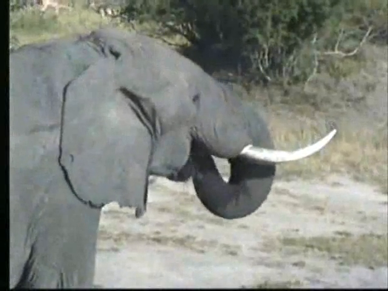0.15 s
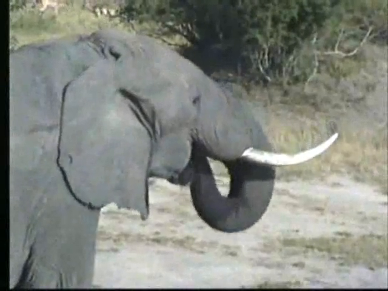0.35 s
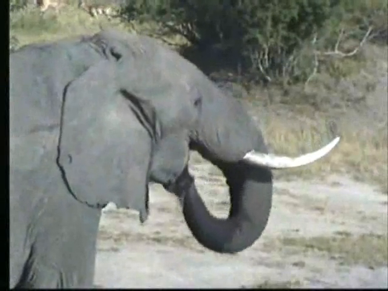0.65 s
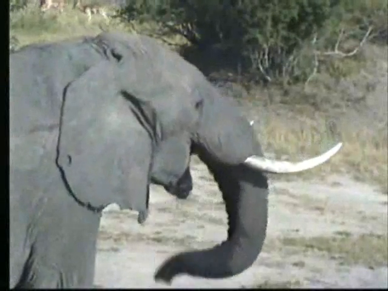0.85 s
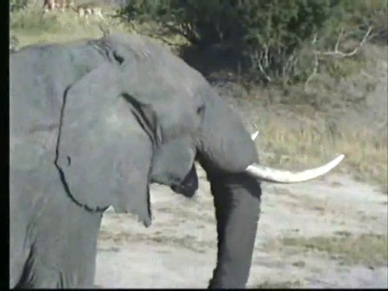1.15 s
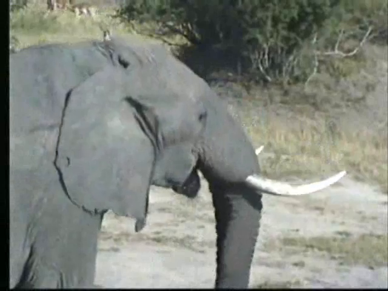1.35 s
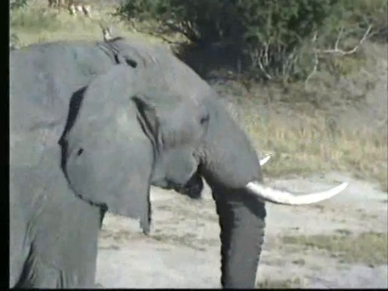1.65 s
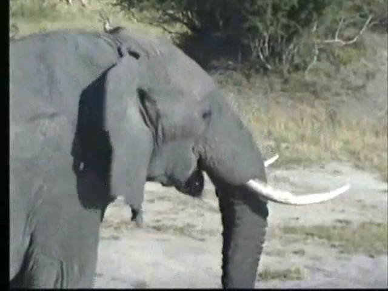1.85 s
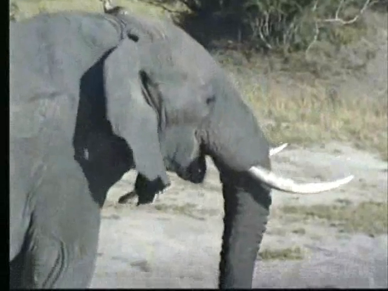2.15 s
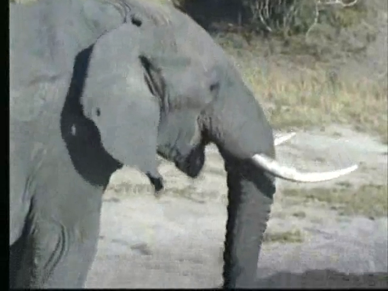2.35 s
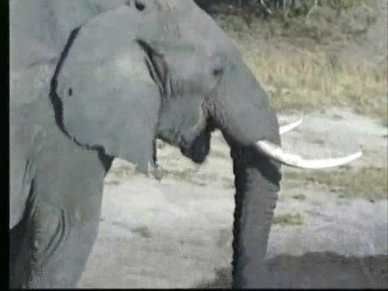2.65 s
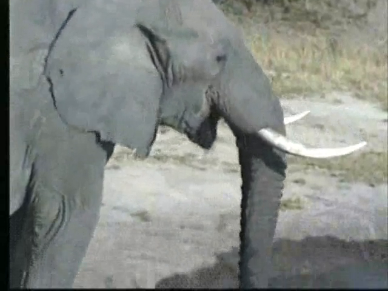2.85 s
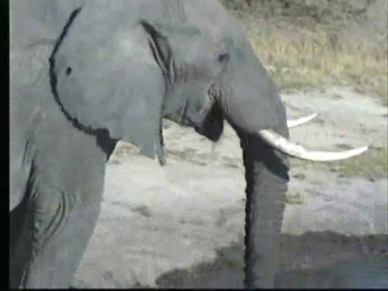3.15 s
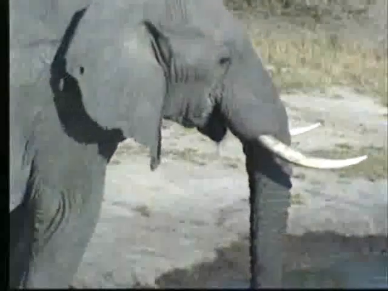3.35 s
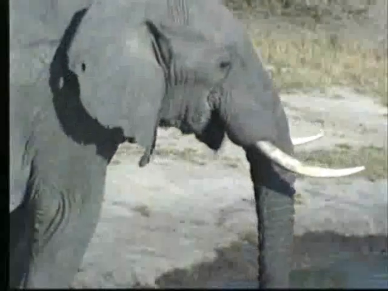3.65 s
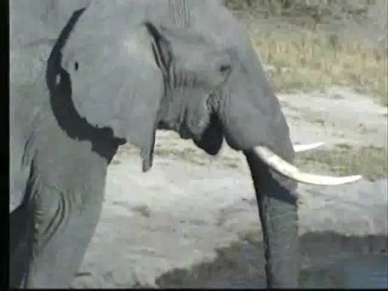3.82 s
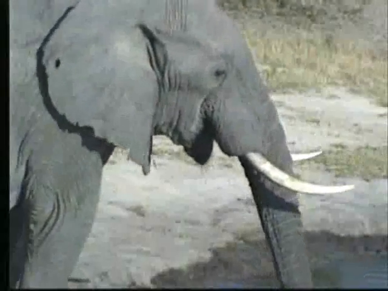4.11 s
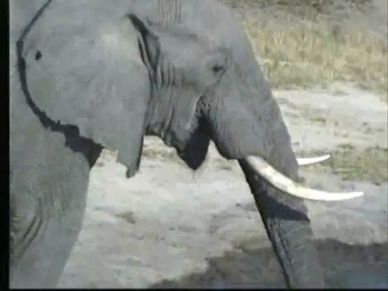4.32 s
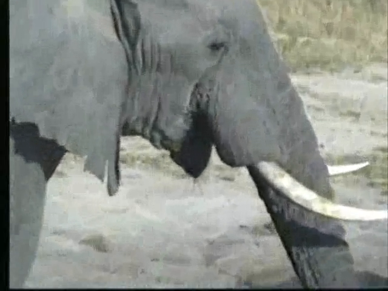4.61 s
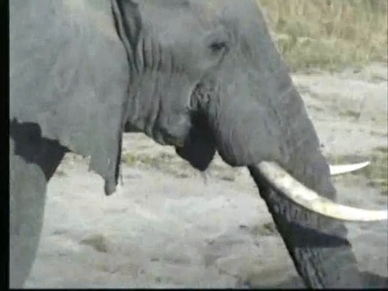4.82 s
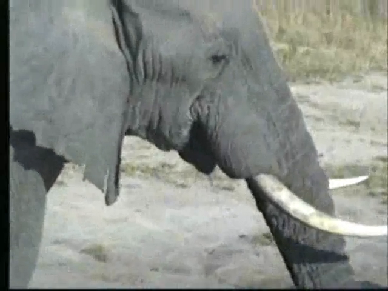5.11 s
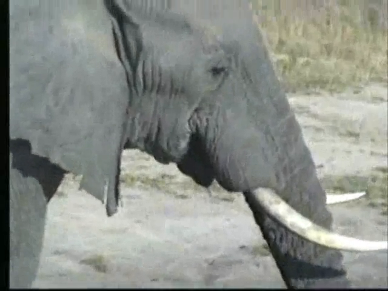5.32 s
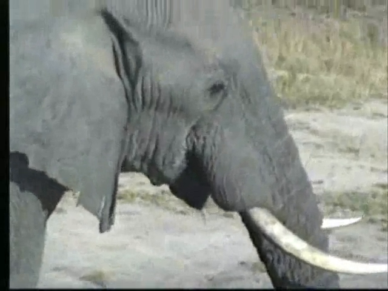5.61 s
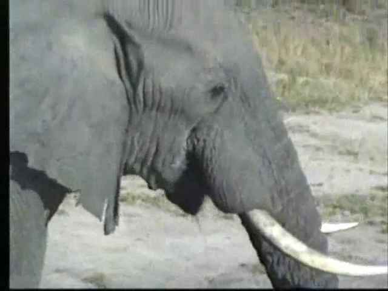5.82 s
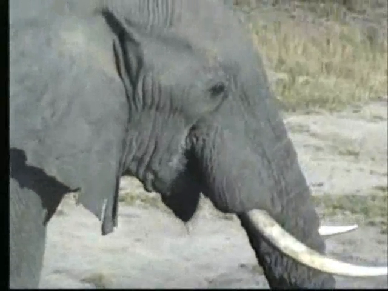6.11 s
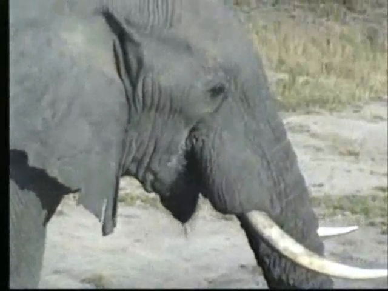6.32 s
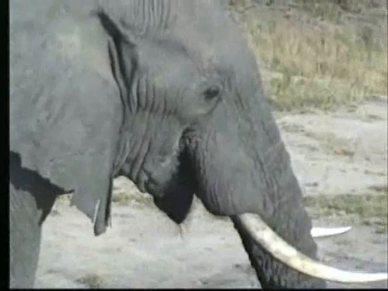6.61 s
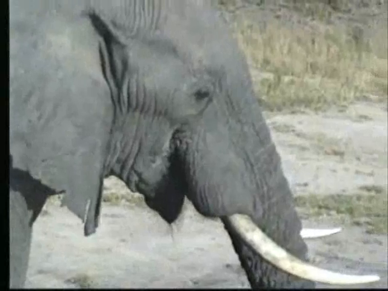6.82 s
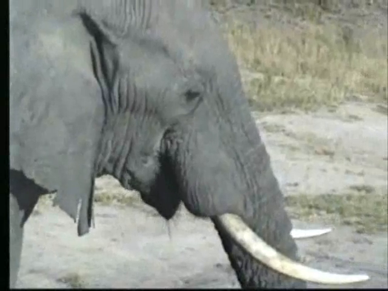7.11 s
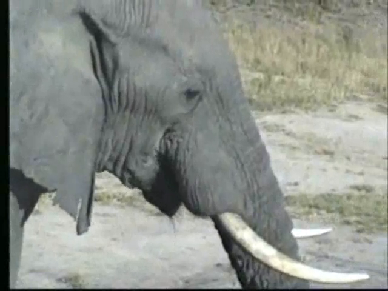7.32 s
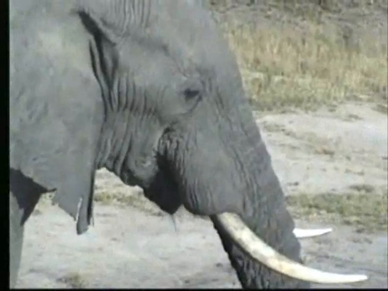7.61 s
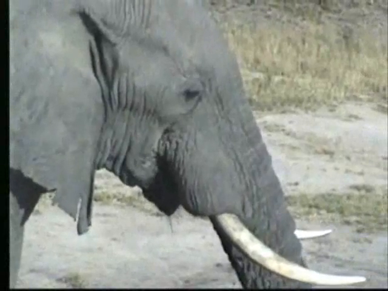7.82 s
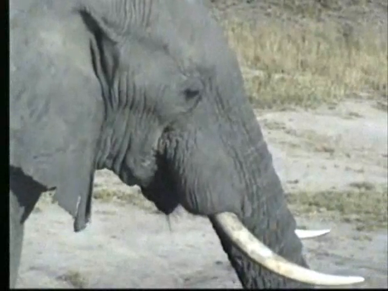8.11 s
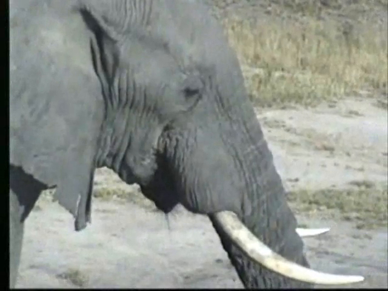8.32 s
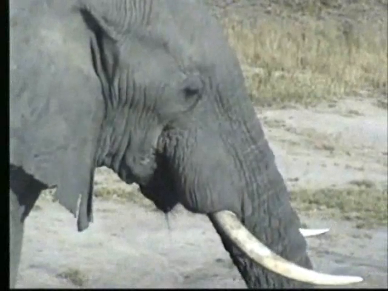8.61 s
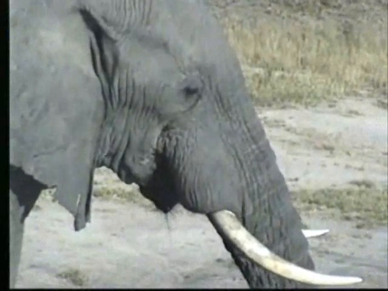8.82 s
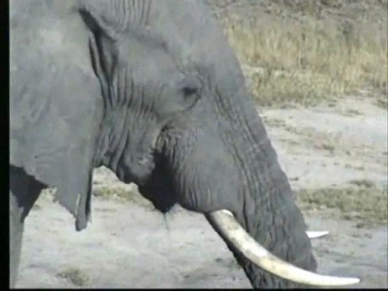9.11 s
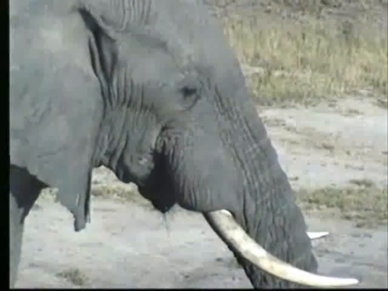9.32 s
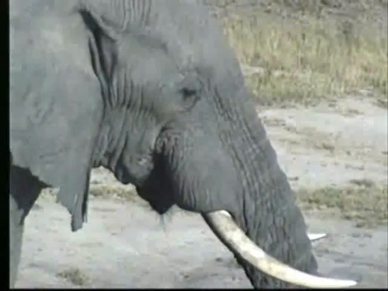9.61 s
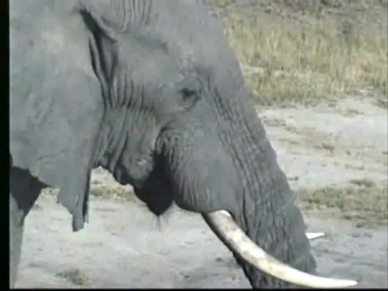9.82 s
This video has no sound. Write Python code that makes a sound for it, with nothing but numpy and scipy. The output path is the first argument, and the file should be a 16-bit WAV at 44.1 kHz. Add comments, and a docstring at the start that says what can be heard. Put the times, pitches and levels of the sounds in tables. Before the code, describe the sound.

Outdoors at a waterhole, an elephant empties its trunk into its mouth. Water splatters down in uneven bursts, with one heavy gush, then thins to isolated drips and a tinkling dribble. Later the trunk tip sloshes in the pool with hollow gurgles before quieting to small blips. A close, narrow-band camera microphone adds steady hiss and faint hum.

```python
"""Splashes, churning water and thin singing streams, over hiss and mains hum: an elephant drinks at a waterhole.
It empties its trunk into its mouth and spills a gush that patters as drops and thins to single drips and a dribble.
Then the lowered trunk tip sloshes and gurgles in the pool to refill.
Drops and air pockets ring as damped bubbles, foam is coloured noise and streams are narrow bands of noise.
One narrow-band camera microphone hears it all, with a very close reflection and a short scatter from the banks."""
import sys
import numpy as np
from scipy import signal
from scipy.fft import rfft, irfft, next_fast_len
from scipy.io import wavfile
from scipy.ndimage import uniform_filter1d, map_coordinates

SR = 44100
rng = np.random.default_rng(int(sys.argv[2]) if len(sys.argv) > 2 else 0)


def waveform_to_disk(signal):
    """Save audio, clipped to [-1, 1], as 16-bit WAV at the path in sys.argv[1]."""
    frames = np.transpose(np.atleast_2d(signal))
    scaled = np.clip(frames, -1, 1) * 32767
    samples = np.round(scaled).astype(np.int16)
    wavfile.write(sys.argv[1], SR, samples)


N = 438780
TIME = np.arange(N) / SR  # s

# All event levels are relative, ahead of the trim of their layer; colours give relative density.
# Hiss of the camera: [f/Hz, level/dB per Hz]
HISS_COLOUR = [(25, -12.5), (70, -11.5), (130, -12), (220, -5), (330, -4.5), (600, 0.84), (1800, 1),
               (4500, 2.5), (6600, 1.4), (7100, -5.5)]
# Mains hum of the camera: [f/Hz, rms level/dB]
HUM = [(100, -68), (150, -51), (250, -49), (350, -56)]
# Loads of water falling into the pool: [start t/s, rise t/s, hold t/s, spray level/dB,
# coarse drops level/dB above the spray]
SPILLS = [(0.0, 0.002, 0.034, -28, -0.5), (0.125, 0.032, 0.058, -27.5, 0), (0.485, .13, 0.021, -21.5, -7.5),
          (0.706, .006, 0.022, -21, -5), (0.76, 0.034, 0.12, -18.5, -5.5), (0.943, 0.011, 0.062, -22, -5),
          (1.095, .015, 0.06, -19.5, -22), (1.203, 0.024, 0.042, -21.5, -2.5),
          (1.284, 0.013, 0.087, -22, -15.5), (1.45, 0.011, .03, -24, -1.5), (1.48, 0.04, 0.05, -11, -8.5),
          (1.543, 0.037, 0.031, -12, -3.5), (1.69, 0.024, 0.11, -21.5, 0.5),
          (1.806, 0.046, 0.12, -25.5, 2.5), (1.994, 0.018, 0.32, -22.5, -12), (2.28, 0.011, 0.14, -24, -2),
          (2.566, 0.035, 0.084, -24.5, -5.5), (5.883, 0.039, 0.071, -20.5, -6),
          (6.06, 0.038, 0.059, -21.5, -3), (7.4, 0.033, 0.048, -31.5, -8), (8.612, 0.017, 0.24, -31, 0.5),
          (9.153, 0.047, .02, -28.5, 1), (9.554, 0.032, 0.044, -35.5, 2), (9.727, 0.032, .02, -39, 6)]
# Slapping sheets of water: [f/Hz, level/dB per Hz]
SLAP_COLOUR = [(900, -30), (1250, -6), (1500, 3.5), (1800, 4), (2050, -13.5), (2500, -20)]
# Coarse drops: [f/Hz, level/dB per Hz]
DROP_COLOUR = [(1500, -38), (2100, -5), (2600, -1), (3000, -3.5), (3400, -0.5), (3900, -9.5), (5000, -31)]
# Fine falling spray: [f/Hz, level/dB per Hz]
SPRAY_COLOUR = [(2400, -26), (3500, -5.5), (3850, 1.5), (4450, 2.5), (5250, 1), (5800, 0.5), (6400, 0),
                (7000, -4), (7600, -32)]
# Spray thrown up by the churning: [f/Hz, level/dB per Hz]
CHURN_SPRAY_COLOUR = [(2400, -23.5), (3500, -8), (4000, -1.5), (4500, 4.5), (5400, -0.5), (6600, -2.5),
                      (7400, -22.5)]
# Shoves that churn the pool: [start t/s, rise t/s, hold t/s, level/dB, air pocket f/Hz,
# splash level/dB above the churning]
SLOSHES = [(0.0, 0.0043, 0.15, -27, 743, -4.5), (0.275, 0.028, 0.21, -33, 453, -33),
           (0.552, 0.041, 0.11, -30, 530, 3), (0.743, 0.029, 0.11, -29, 580, -24),
           (1.106, 0.0098, 0.13, -33.5, 502, 7.5), (1.555, 0.065, 0.11, -19.5, 834, 2),
           (1.755, .02, 0.16, -30, 852, -5), (2.03, 0.017, 0.043, -32, 710, 7.5),
           (5.987, 0.018, 0.16, -17, 645, -3.5), (6.165, 0.02, 0.037, -15, 726, -3),
           (6.271, 0.033, 0.063, -16.5, 627, -5.5), (6.415, 0.055, 0.025, -19.5, 560, 3),
           (6.527, 0.055, 0.04, -15, 617, -4), (6.645, 0.0068, 0.048, -23.5, 563, -5),
           (6.741, 0.13, 0.055, -22, 524, -12.5), (6.949, 0.039, 0.072, -25, 732, -6),
           (7.07, 0.03, 0.16, -31.5, 620, -4.5), (7.232, 0.003, 0.01, -30, 633, 5.5),
           (7.428, 0.017, 0.043, -32, 578, -17), (7.549, 0.017, .06, -35, 474, -18),
           (8.535, .03, 0.058, -29, 633, -23), (8.662, 0.012, 0.1, -27, 741, -9.5),
           (9.215, 0.045, 0.025, -22.5, 680, -7), (9.291, 0.0097, 0.012, -20, 648, -0.5),
           (9.785, 0.016, 0.02, -29.5, 836, -0.5)]
# Churned air pockets: [f/Hz, level/dB per Hz]
SLOSH_COLOUR = [(50, -29), (130, -16), (250, 2), (350, -7.5), (450, -2), (600, 2), (780, -2.5), (1080, 2.5),
                (1300, -4), (2000, -13)]
# Narrow streams that sing at a gliding pitch: [start t/s, length t/s, level/dB, first f/Hz,
# f/Hz at the turn, last f/Hz, turn as a share of the length]
STREAMS = [(0.0, 0.34, -33, 620, 623, 580, 0.61), (0.0, 0.12, -29, 784, 884, 997, 0.45),
           (0.282, 0.15, -31, 390, 305.5, 340, 0.35), (1.855, 0.14, -26, 4600, 3890, 3940, 0.42),
           (1.905, 0.077, -23, 3250, 2800, 3030, 0.54), (2.07, 0.11, -33, 4300, 4550, 5600, 0.63),
           (2.366, 0.065, -24, 2950, 2650, 2990, 0.41), (2.467, 0.098, -27.5, 3150, 3450, 4060, 0.45),
           (2.508, 0.056, -33.5, 1800, 2000, 2180, 0.44), (4.097, 0.17, -37.5, 2100, 2165, 2200, 0.47),
           (5.025, 0.079, -34.5, 2200, 2245, 2270, .5), (5.529, 0.11, -39, 2600, 2750, 3040, 0.45),
           (6.255, 0.054, -26, 4400, 4000, 4250, 0.59), (8.062, 0.093, -39, 1924, 1605, 1390, 0.47),
           (9.795, 0.079, -30, 5500, 5330, 5070, 0.43)]
# Single drops that hit the pool: [t/s, level/dB, bubble f/Hz at first, break-up decay t/s]
DRIPS = [(0.42, -11.5, 6100, 0.0035), (0.491, -8.5, 5060, .003), (0.506, -7.5, 5400, 0.0026),
         (0.5198, -5, 4920, 0.0022), (0.542, -3.5, 5220, 0.0024), (0.555, -8, 5640, 0.0022),
         (0.554, -17, 2830, .003), (0.593, -9, 6600, 0.002), (0.608, -7.5, 5370, .002),
         (0.638, -11.5, 6300, 0.0034), (0.7045, -8.5, 3800, 0.0027), (0.7107, -10.5, 2930, .006),
         (0.777, -9, 2620, 0.0037), (0.8156, -7, 2800, 0.0059), (0.838, -10, 4630, 0.0033),
         (0.881, -10, 4940, .006), (0.897, -4, 5870, 0.0047), (0.9122, -4.5, 4440, 0.0045),
         (0.9725, -13, 4100, 0.005), (0.9877, -13, 5250, 0.0025), (1.0088, -5.5, 5280, 0.0033),
         (1.094, -9.5, 6240, 0.003), (1.151, -11.5, 4230, 0.0033), (1.187, -12, 2880, 0.0044),
         (1.236, -15, 6640, .004), (1.2457, -11.5, 2750, 0.005), (1.3093, -10.5, 5200, 0.0051),
         (1.446, -12, 4030, 0.004), (1.52, -4.5, 2680, 0.0068), (1.625, 0.5, 5430, 0.0045),
         (2.1362, -12, 5300, .004), (2.223, -13, 2230, .005), (2.228, -11, 6210, 0.0018),
         (2.296, -11.5, 5700, 0.0094), (2.295, -6, 2780, 0.0047), (2.36, -11.5, 3300, 0.0045),
         (2.923, -14, 2640, .003), (2.925, -16, 5360, 0.002), (3.15, -16, 3040, 0.008),
         (3.243, -15, 2930, 0.0089), (3.367, -8.5, 4040, 0.003), (3.395, -13, 5400, .005),
         (3.428, -9, 6020, 0.0059), (3.767, -10, 3300, 0.0026), (3.767, -17, 5230, 0.004),
         (3.8897, -10, 3820, 0.0035), (3.89, -15, 2970, 0.0044), (4.341, -20, 2730, .01),
         (4.369, -17.5, 4870, 0.0078), (4.418, -17, 4400, .007), (4.67, -15.5, 5900, 0.0055),
         (4.722, -14.5, 4190, 0.0072), (4.817, -15.5, 4460, .005), (4.815, -14.5, 2740, 0.019),
         (5.0227, -7.5, 4380, .002), (5.045, -21, 4530, .006), (5.37, -17, 5900, 0.0097),
         (5.594, -28, 3070, .003), (5.937, -8.5, 5430, 0.0076), (5.979, -5, 4270, 0.0058),
         (6.323, -14.5, 3020, 0.003), (6.424, -10.5, 4560, 0.0033), (7.24, -23, 1790, 0.01),
         (8.202, -21, 4240, 0.0046), (9.2184, -17, 3160, 0.0037), (9.259, -16, 3000, 0.0026),
         (9.269, -16, 1760, 0.007), (9.3, -12.5, 1540, 0.0043), (9.321, -11.5, 6500, 0.0033),
         (9.345, -12, 2850, .005), (9.365, -10, 6730, .002), (9.788, -19, 1720, 0.0066)]
# Droplets around the main bubble of a drip: [pitch ratio, level/dB per Hz]
DROP_BODY = [(.68, -24), (.84, -6.5), (1, 0), (1.14, -5), (1.45, -13.5), (3.001, -36.5)]
# Large bubbles that burst: [t/s, level/dB, f/Hz at first]
GLUGS = [(0.799, -11.5, 594), (0.883, -9, 595), (1.138, -14.5, 493), (5.959, -12, 625), (6.01, -5.5, 780),
         (6.058, -8.5, 530), (6.193, -1, 820), (6.215, -2, 660), (6.45, -5.5, 650), (6.48, -6.5, 566),
         (6.573, -17, 580), (6.67, -5.5, 570), (6.706, -12, 584), (6.873, -14.5, 600), (6.929, -6.5, 565),
         (6.958, -15, 620), (7.039, -15.5, 850), (7.24, -12.5, 655), (8.62, -8, 643), (8.635, -14, 596),
         (8.805, -17, 563), (8.806, -12, 950), (9.124, -18, 680), (9.217, -17, 571), (9.245, -18, 563),
         (9.307, -10, 776), (9.824, -13.5, 1070)]
# Runs of dribble from the wet lip and trunk: [start t/s, rise t/s, hold t/s, level/dB]
DRIBBLES = [(2.762, 0.025, 0.12, -30), (3.042, 0.018, 0.073, -27.5), (3.24, 0.018, 0.053, -29),
            (3.442, 0.034, 0.055, -30.5), (3.55, 0.029, 0.037, -28), (3.759, .01, 0.026, -27.5),
            (3.885, .01, 0.028, -28.5), (4.005, 0.057, 0.19, -30.5), (4.33, .015, 0.094, -30),
            (4.815, 0.0071, 0.025, -41), (5.026, .015, .02, -28.5), (5.353, .015, .03, -33.5),
            (5.508, 0.027, 0.022, -27.5)]
# Tinkling dribble: [f/Hz, level/dB per Hz]
DRIBBLE_COLOUR = [(1200, -5), (2300, 6), (3400, 0), (4500, 4), (6600, 2), (7500, -21)]

HISS_DB, EDGE_HZ = -31, 7150  # hiss rms ahead of the band limit; upper edge of the band
SPILL_FADE_DB_PER_S, SLOSH_FADE_DB_PER_S, DRIBBLE_FADE_DB_PER_S = 86.5, 170, 81
SPILL_SLAP_DB = -7  # sheets relative to the coarse drops
SLOSH_THROW_DB = -2  # share of a splash given to each of sheets, coarse drops and spray
SPRAY_FOAM, SPRAY_MERGE_DB = .75, -19
WASH_DB, WASH_FADE_DB_PER_S = -23.5, 65  # the pool keeps rocking after each shove
GLUG_STIR_DB, GLUG_STIR_S = -14.5, 0.013  # a burst bubble churns the water around it
STREAM_EDGE_S, STREAM_SPUTTER_DB = 0.021, 2.4
DROP_RING, DROP_BURST, DROP_CRACK = 1.7, .46, .42  # gains of bubble, droplets and crack
REFLECTION = .36  # gain


def amp(db):
    """Turns decibels into gain."""
    return 10 ** (np.asarray(db) / 20)


def unit(x):
    """Scales to rms 1."""
    return x / np.sqrt(np.mean(x ** 2) + 1e-20)


def add(mix, s, sound):
    """Mixes a sound in at time s."""
    part = mix[max(round(s * SR), 0):][:len(sound)]
    part += sound[:len(part)]


def colour(x, points):
    """Filters by a spectrum drawn on a log-frequency axis."""
    hz, db = np.transpose(points)
    size = next_fast_len(len(x) + 4096)
    bins_hz = np.fft.rfftfreq(size, 1 / SR)
    gain = amp(np.interp(np.log(bins_hz + 1), np.log(hz), db))
    return irfft(rfft(x, size) * gain, size)[:len(x)]


def surge(start, rise_s, hold_s, db, fade_db_per_s):
    """Power over time of one movement of water: it swells, holds and dies away."""
    power = np.zeros(N)
    t = np.arange(0, rise_s + hold_s + .7, 1 / SR)
    fade_db = fade_db_per_s * np.maximum(t - rise_s - hold_s, 0)
    add(power, start, (np.minimum(t / rise_s, 1) * amp(db - fade_db)) ** 2)
    return power


def lumps(depth_db, lump_s):
    """Water moves unevenly: a random gain that changes from lump to lump."""
    heights = np.clip(rng.standard_normal(4000), -2, 2)
    return unit(amp(depth_db * np.interp(TIME / lump_s, np.arange(len(heights)), heights)))


def crackle(per_s=110, lift=2.5, decay_s=0.0025):
    """Each little impact lifts all bands of a splash at once: a spiky random gain."""
    hits = (rng.random(N) < per_s / SR) * rng.random(N)
    spikes = signal.lfilter([1], [1, -np.exp(-1 / (decay_s * SR))], hits)
    return unit(np.sqrt(1 + lift * spikes))


def bubble(t, hz, ring_s, rise, onset_s):
    """A trapped bubble rings down; its pitch climbs as it nears the surface."""
    envelope = (1 - np.exp(-t / onset_s)) * np.exp(-t / ring_s)
    return envelope * np.sin(2 * np.pi * hz * t * (1 + rise * t / ring_s))


def swarm(at, hz, ring_s, rise, spread_db, size):
    """Many bubbles of unequal strength and damping start at the samples `at`; evened out, rms 1."""
    strength, damping, sign = rng.random((len(at), 3)).T[:, :, None]
    height = amp(spread_db * np.minimum(-np.log(1 - strength), 3.5)) * np.sign(sign - .5)
    each_ring_s = ring_s * (.5 + damping)
    rings = height * bubble(np.arange(size) / SR, hz[:, None], each_ring_s, rise, ring_s / 4)
    samples = at[:, None] + np.arange(size)
    x = np.bincount(samples.ravel(), rings.ravel(), N)[:N]
    local_power = uniform_filter1d(x ** 2, size=5000)
    return unit(x / np.sqrt(local_power + 1e-9))


def patter(gain, spectrum, lo_hz, hi_hz, ring_s, spread_db, foam, merge_db, count):
    """Small drops ring in a band of pitches; in a flow stronger than merge_db they drown in their own foam."""
    when, pitch = rng.random((count, 2)).T
    hz = lo_hz + (hi_hz - lo_hz) * pitch
    rings = swarm((when * N).astype(int), hz, ring_s, 0.0063, spread_db, size=500)
    fizz = unit(colour(rng.standard_normal(N), spectrum))
    share = np.hypot(foam, gain / amp(merge_db))  # fizz relative to rings
    return gain * (unit(colour(rings, spectrum)) + share * fizz) / np.hypot(1, share)


def electronics():
    """The camera adds its own steady noise, shaped as hiss, and sines of mains hum."""
    spectrum = HISS_COLOUR + [(EDGE_HZ + 300, -60)]
    hiss = amp(HISS_DB) * unit(colour(rng.standard_normal(N), spectrum))
    hum = sum(amp(db) * np.sqrt(2) * np.sin(2 * np.pi * (hz * TIME + rng.random())) for hz, db in HUM)
    return hiss + hum


def flows():
    """Strength of sheets, coarse drops, falling spray and the spray that the churning throws up."""
    fine = sum(surge(s, rise, hold, db, SPILL_FADE_DB_PER_S) for s, rise, hold, db, _ in SPILLS)
    coarse = sum(surge(s, rise, hold, db + more, SPILL_FADE_DB_PER_S)
                 for s, rise, hold, db, more in SPILLS)
    splashes = sum(surge(s, rise, hold, db + splash, SLOSH_FADE_DB_PER_S)
                   for s, rise, hold, db, _, splash in SLOSHES)
    thrown = amp(SLOSH_THROW_DB) ** 2 * splashes
    sheets = amp(SPILL_SLAP_DB) ** 2 * coarse + thrown
    powers = sheets, coarse + thrown, fine, thrown
    return np.sqrt(powers) * lumps(depth_db=0.5, lump_s=.014) * crackle()


def spill():
    """Water falls from mouth and trunk as slapping sheets, coarse drops and fine spray; shoves splash more up."""
    sheets, coarse, fine, thrown = flows()
    slaps = patter(amp(-4.5) * sheets, SLAP_COLOUR, 1074, 2466,
                   ring_s=.002, spread_db=2.5, foam=0.96, merge_db=-13.5, count=4000)
    drops = patter(amp(-3.0) * coarse, DROP_COLOUR, 1900, 3800,
                   ring_s=0.0019, spread_db=3.5, foam=0.31, merge_db=-31.5, count=6000)
    spray = patter(amp(-2.5) * fine, SPRAY_COLOUR, 3190, 7400,
                   ring_s=0.0017, spread_db=3.5, foam=SPRAY_FOAM, merge_db=SPRAY_MERGE_DB, count=8000)
    churned = patter(thrown, CHURN_SPRAY_COLOUR, 3300, 7000,
                     ring_s=0.0035, spread_db=2.0, foam=SPRAY_FOAM, merge_db=SPRAY_MERGE_DB, count=7000)
    return slaps + drops + spray + churned


def slosh(scatter=0.343, count=10000):
    """Churned water traps large, heavily damped air pockets; the strongest shove sets their size."""
    shoves = np.array([surge(s, rise, hold, db, SLOSH_FADE_DB_PER_S)
                       + surge(s, rise, hold, db + WASH_DB, WASH_FADE_DB_PER_S)
                       for s, rise, hold, db, _, _ in SLOSHES])
    stirred = sum(surge(s, GLUG_STIR_S, 0, db + GLUG_STIR_DB, SLOSH_FADE_DB_PER_S) for s, db, _ in GLUGS)
    at = rng.integers(0, N, count)
    strongest = shoves[:, at].argmax(axis=0)
    shove_hz = np.array([row[4] for row in SLOSHES])
    hz = shove_hz[strongest] * np.exp(scatter * rng.standard_normal(count))
    pockets = swarm(at, hz, ring_s=0.0035, rise=0.018, spread_db=1.5, size=700)
    churn = np.sqrt(shoves.sum(axis=0) + stirred) * lumps(depth_db=1.9, lump_s=0.013)
    return amp(-3.0) * unit(colour(pockets, SLOSH_COLOUR)) * churn


def streams(width_hz=50, width_share=0.028):
    """A stream shakes a hollow of changing size: a fuzzy tone that sputters along its pitch."""
    out = np.zeros(N)
    for s, length, db, *hz, turn in STREAMS:
        t = np.arange(0, length, 1 / SR)
        smooth = signal.butter(3, width_hz + width_share * np.mean(hz), fs=SR)
        # two slow noises on cosine and sine make a narrow band around the gliding pitch
        a, b = signal.lfilter(*smooth, rng.standard_normal((2, SR)))[:, :len(t)]
        slow_noise = unit(uniform_filter1d(rng.standard_normal(SR), size=500))
        flutter = amp(STREAM_SPUTTER_DB * slow_noise)[:len(t)]
        glide_hz = np.interp(t / length, [0, turn, 1], hz)
        phase = 2 * np.pi * np.cumsum(glide_hz) / SR
        envelope = np.minimum(np.minimum(t, length - t) / STREAM_EDGE_S, 1) * amp(db)
        add(out, s, envelope * unit(flutter * (a * np.cos(phase) + b * np.sin(phase))))
    return out


def drips(splash_db=-17, splash_s=0.066, rebound_db=-13, rebound_s=0.031, scatter=0.26, count=4):
    """Each drop cracks on the surface, rings a bubble and breaks into like-pitched droplets; a few rebound."""
    out, t = np.zeros(N), np.arange(SR // 6) / SR
    ring = dict(ring_s=.0023, rise=.004, onset_s=.0006)
    tick_colour = [(1500, -20.5), (2700, -4.0), (5500, 0), (7500, -14.0), (9000, -35.5)]
    for s, db, hz, break_s in DRIPS:
        main = DROP_RING * bubble(t, hz, **ring)
        tick = unit(colour(rng.standard_normal(len(t)), tick_colour))
        body_colour = [(hz * ratio, level) for ratio, level in DROP_BODY]
        droplets = unit(colour(rng.standard_normal(len(t)), body_colour))
        burst = (DROP_CRACK * tick + DROP_BURST * droplets) * np.exp(-t / break_s)
        splash = amp(splash_db) * droplets * np.exp(-t / splash_s)
        add(out, s, amp(db) * (main + burst + splash))
        for late, detune in rng.random((count, 2)):
            small = bubble(t, hz * (1 + scatter * (2 * detune - 1)), **ring)
            add(out, s + break_s + rebound_s * late, amp(db + rebound_db) * np.exp(-late) * small)
    return amp(-2.5) * out


def glugs(ring_s=0.0045, rise=0.024, spatter_db=-21, spatter_s=0.014):
    """Single large bubbles break at the mouth or the trunk tip and spatter."""
    out, t = np.zeros(N), np.arange(SR // 20) / SR
    spatter_colour = [(100, -29), (300, -7.0), (800, 5.5), (2000, 1.0), (7000, -13.0), (9000, -53.0)]
    for s, db, hz in GLUGS:
        noise = unit(colour(rng.standard_normal(len(t)), spatter_colour))
        spatter = amp(spatter_db) * noise * np.exp(-t / spatter_s)
        add(out, s, amp(db) * (bubble(t, hz, ring_s, rise, 0.0015) + spatter))
    return amp(2.0) * out


def thump(s=1.617, db=-17, hz=54, ring_s=0.012, onset_s=0.0037):
    """The bulk of the gush lands with a low push, a short damped tone."""
    out = np.zeros(N)
    add(out, s, amp(db) * bubble(np.arange(SR // 4) / SR, hz, ring_s, .02, onset_s))
    return out


def dribble():
    """A thin dribble tinkles in the pool with longer rings than the falling spill."""
    flow = np.sqrt(sum(surge(*row, DRIBBLE_FADE_DB_PER_S) for row in DRIBBLES))
    return patter(flow, DRIBBLE_COLOUR, 2400, 6920,
                  ring_s=0.0028, spread_db=4.0, foam=0.53, merge_db=-26.0, count=3500)


def hollows(x, depth_db=2.5, life_s=.045, width_hz=330):
    """Hollows open and close in the moving water: a random gain over pitch and time lifts and dips bands."""
    hz, t, z = signal.stft(x, SR, nperseg=512)
    heights = np.clip(rng.standard_normal((200, 1000)), -2, 2)
    grid = np.meshgrid(hz / width_hz, t / life_s, indexing="ij")
    gain = amp(depth_db * map_coordinates(heights, grid, order=1, mode="wrap"))
    return signal.istft(z * unit(gain), SR, nperseg=512)[1][:N]


def surroundings(x, delay_s=0.000859, sway=0.036, sway_s=0.14, scatter_db=-14, t60=0.14):
    """A very close reflection notches the sound at even steps that shift as water moves; the banks scatter a tail."""
    path = 1 + sway * np.interp(TIME / sway_s, np.arange(500), rng.uniform(-1, 1, 500))
    reflected = np.interp(TIME - delay_s * path, TIME, x, 0)
    near = (x - REFLECTION * reflected) / np.hypot(1, REFLECTION)
    t = np.arange(SR // 2) / SR
    echoes = rng.standard_normal(len(t)) * (rng.random(len(t)) < .05)  # sparse
    tail = echoes * amp(-60 * t / t60) * (t > .004)
    return near + amp(scatter_db) * signal.fftconvolve(near, tail / np.linalg.norm(tail))[:N]


def scene():
    """All the water at the one microphone, the same in both channels."""
    water = hollows(spill() + dribble()) + slosh() + streams() + drips() + glugs()
    mono = electronics() + surroundings(water) + thump()
    return np.array([mono, mono])


def record(dry):
    """The input stage caps the peaks; then a lowpass limits the band."""
    capped = np.clip(dry, -.75, .75)
    lowpass = signal.firwin(401, EDGE_HZ, window=("kaiser", 7), fs=SR)
    return signal.oaconvolve(capped, lowpass[None], "same", axes=1)


dry = scene()
out = record(dry)
waveform_to_disk(out)
```